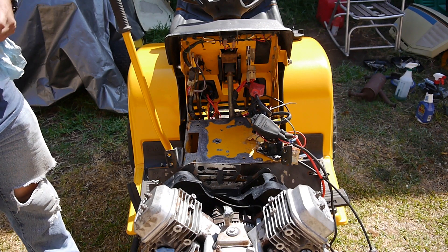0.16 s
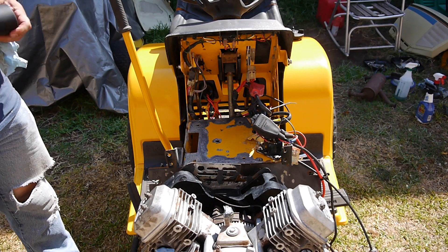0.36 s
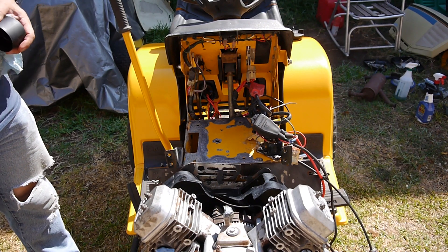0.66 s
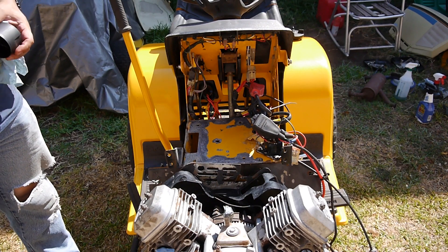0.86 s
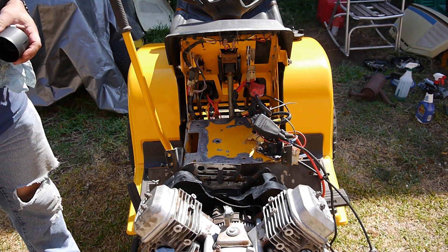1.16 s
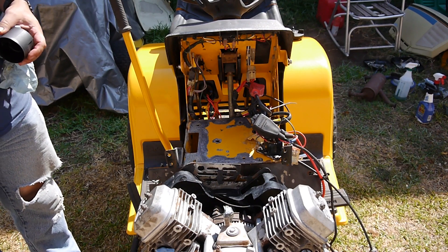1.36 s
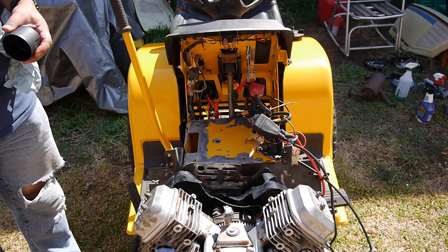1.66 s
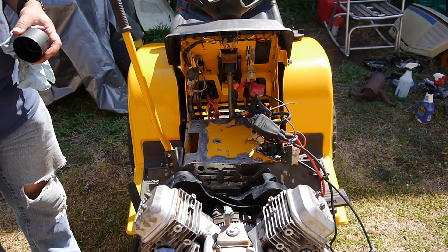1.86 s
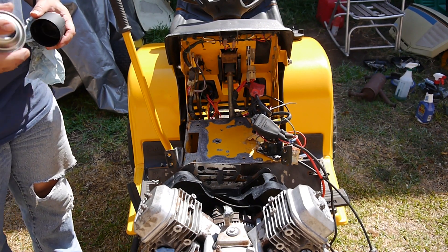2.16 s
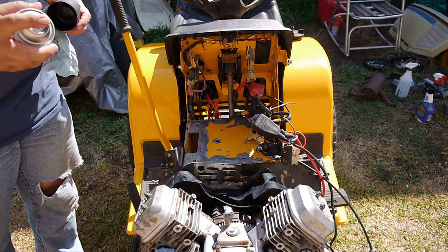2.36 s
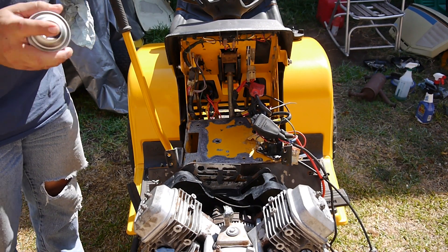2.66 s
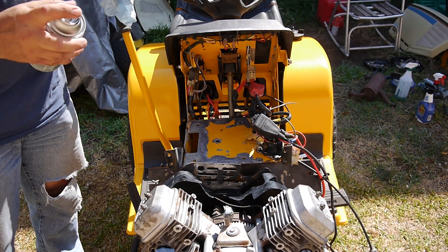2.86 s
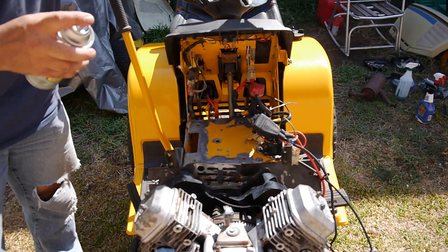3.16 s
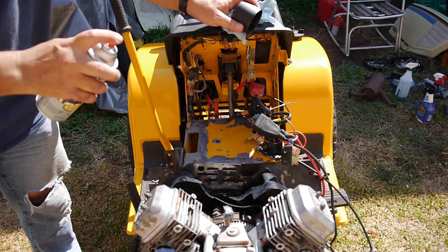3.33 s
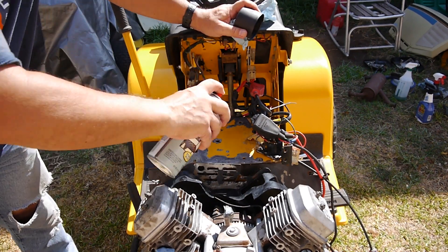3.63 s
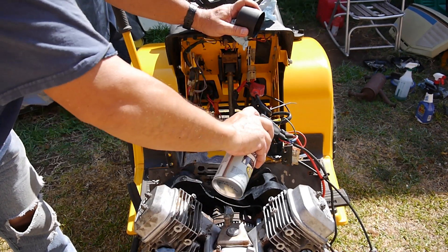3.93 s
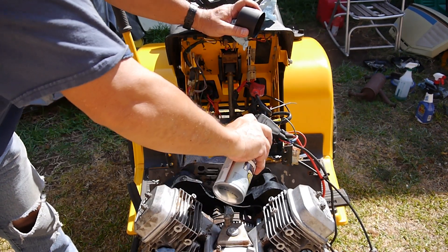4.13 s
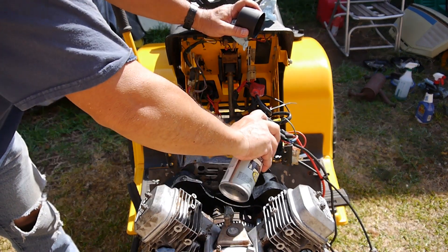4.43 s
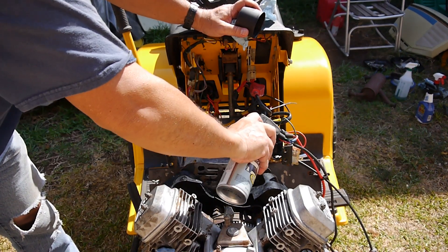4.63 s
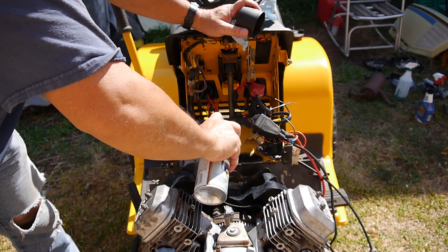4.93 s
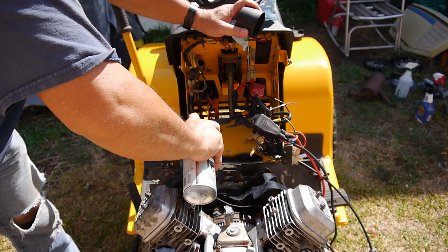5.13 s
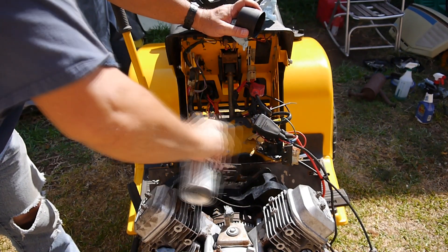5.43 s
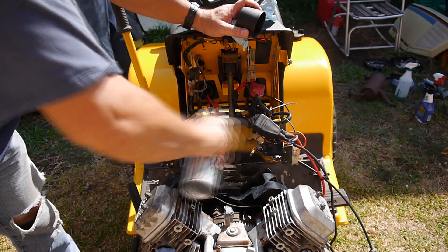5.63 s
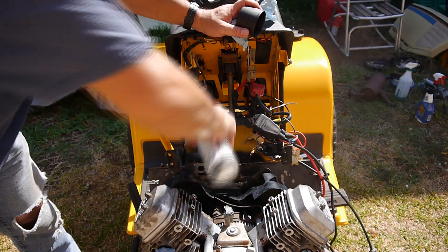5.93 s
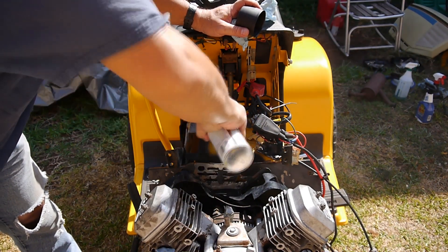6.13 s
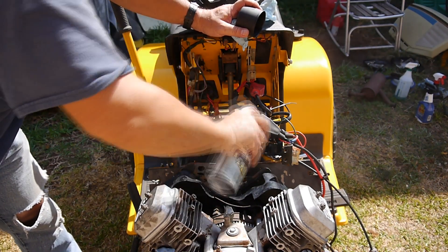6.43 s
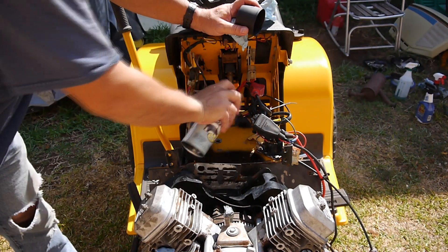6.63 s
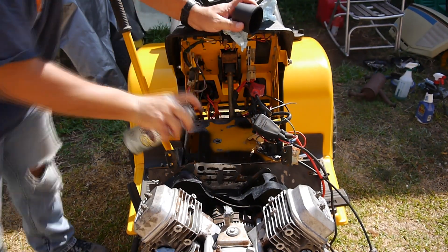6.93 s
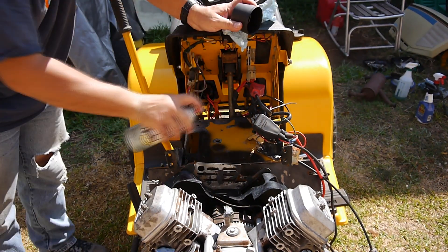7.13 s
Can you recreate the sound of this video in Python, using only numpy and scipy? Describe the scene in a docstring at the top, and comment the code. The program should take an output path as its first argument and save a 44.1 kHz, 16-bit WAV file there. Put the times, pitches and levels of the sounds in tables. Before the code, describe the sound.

In a quiet yard, a paint can is shaken close by: a hard ball clacks and rolls in tin with quick, uneven metallic clicks, while wind thumps at the microphone. The rattle thins out, a knock follows, then the nozzle hisses in a few longer sprays and many short puffs, with faint ball ticks between them.

```python
"""Outdoors, in a quiet yard, a spray can is shaken: its ball strikes and rolls along the tin wall and domes.
Blows and rolling excite decaying modes and cracks of noise, echoed by the ground. Knocks and pops are short
bursts and swings. Wind, strongest at first, is lumpy low noise at the microphone. Later the nozzle hisses
in long and short bursts, as coloured noise with narrow tones, and its jet roars on a machine.
The yard's traffic and leaves are coloured noise below it all."""
import sys
import numpy as np
from scipy import signal
from scipy.fft import rfft, irfft
from scipy.io import wavfile
from scipy.ndimage import uniform_filter1d

SR = 44100
rng = np.random.default_rng(int(sys.argv[2]) if len(sys.argv) > 2 else 0)


def waveform_to_disk(signal):
    """Save audio, clipped to [-1, 1], as 16-bit WAV at the path in sys.argv[1]."""
    frames = np.transpose(np.atleast_2d(signal))
    scaled = np.clip(frames, -1, 1) * 32767
    samples = np.round(scaled).astype(np.int16)
    wavfile.write(sys.argv[1], SR, samples)


N = 321489
TIME_S = np.arange(N) / SR


def undb(db):
    """Amplitude factor of a level in dB."""
    return 10 ** (np.asarray(db) / 20)


def unit(x):
    """Scale to rms 1."""
    return x / np.sqrt(np.mean(x ** 2))


def curve(table, col):
    """One column over time, in dB; -120 dB outside the table."""
    rows = np.array(table)
    return np.interp(TIME_S, rows[:, 0], rows[:, col], left=-120, right=-120)


def coloured(points):
    """Noise with the given spectrum, rms 1."""
    hz = np.arange(1, N // 2 + 2) * SR / N
    point_hz, point_db = np.array(points).T
    db = np.interp(np.log(hz), np.log(point_hz), point_db)
    return unit(irfft(rfft(rng.standard_normal(N)) * undb(db), N))


def band(x, lo_hz, hi_hz):
    """Band-pass filter."""
    sos = signal.butter(2, [lo_hz, min(hi_hz, .45 * SR)], "band", fs=SR, output="sos")
    return signal.sosfilt(sos, x)


def walk(rate_hz):
    """Random levels, a new one each 1 / rate_hz s, joined by ramps; spread near 1."""
    hold = int(SR / rate_hz)
    steps = np.repeat(rng.standard_normal(N // hold + 1), hold)
    return uniform_filter1d(steps, hold)[:N]


def add(out, start_s, y):
    """Mix y into out from start_s, cut at the end."""
    i = int(start_s * SR)
    out[i:i + len(y)] += y[:len(out) - i]


# Spectrum of the yard. Each row: frequency in Hz, relative level in dB per Hz.
YARD_SPECTRUM = [(18, -48), (30, -23), (38, -11.5), (174, -4), (204, -10), (273, -4.5), (415, -2),
                 (449, -6), (780, -3), (1040, -7.5), (2830, -17.5), (7670, -14), (16000, -35)]
# Yard level. Each row: time in seconds, level below 2 kHz in dB, level above in dB.
YARD_LEVEL = [(0, -46, -40), (1.6, -46, -47), (2.9, -45.5, -48), (3.7, -44.5, -48), (4.5, -44, -46),
              (5.33, -45, -48.5), (5.36, -48, -57), (6.9, -50.5, -56), (7.29, -42.5, -54)]


def yard():
    """Distant traffic and leaves: coloured noise in two bands, swelling a little."""
    air = coloured(YARD_SPECTRUM)
    low = signal.sosfilt(signal.butter(2, 2000, fs=SR, output="sos"), air)
    low_db = curve(YARD_LEVEL, 1) + 2.2 * walk(5)
    high_db = curve(YARD_LEVEL, 2) + 0.12 * walk(2.5)
    return unit(low) * undb(low_db) + unit(air - low) * undb(high_db)


# Puffs at the microphone, an early and a late group.
# Each row: peak in seconds, rumble in dB, half length to 1/e in seconds, upper band re rumble in dB.
WIND_PUFFS = [
    [(0, -29, 0.044, -9.5), (.1, -30, 0.024, -11), (.19, -30, 0.067, -9), (.35, -24.5, 0.05, -4),
     (.46, -33, 0.087, -14), (.655, -25.5, 0.014, 3), (.7, -30, 0.043, 6.5), (.735, -29, 0.028, 0.1),
     (.83, -26.5, 0.013, -33), (.94, -30.5, 0.057, -3), (1.1, -34, 0.058, -6), (1.22, -35.5, 0.03, -10),
     (1.33, -35, 0.059, -4), (1.54, -34.5, 0.073, -19), (1.72, -36.5, 0.064, -17), (1.86, -33.5, 0.02, -24),
     (1.91, -29, 0.035, -10), (2.04, -33.5, 0.046, -6), (2.26, -36.5, 0.034, -4)],
    [(6.74, -50, 0.06, -16), (6.93, -45, 0.11, -12)],
]


def wind():
    """Turbulent puffs: lumpy rumble, each with its share of an upper band; the late rumble is narrower."""
    def rumble(lo_hz, hi_hz):
        return unit(band(band(rng.standard_normal(N), lo_hz, hi_hz), lo_hz, hi_hz))

    out = 0
    for group, top_hz in zip(WIND_PUFFS, (280, 165)):
        lumps = undb(4.5 * walk(80))
        low, deep, high = rumble(101.2, top_hz), rumble(55.0, 97.4), rumble(204, 472)
        high = high + undb(-4.5) * unit(band(rng.standard_normal(N), 390, 900))
        puffs = [undb(db) * np.exp(-((TIME_S - peak_s) / half_s) ** 2) for peak_s, db, half_s, _ in group]
        upper = sum(puff * undb(row[3]) for puff, row in zip(puffs, group))
        out = out + lumps * (sum(puffs) * (low + undb(-13.0) * deep) + upper * high)
    return out


POP_MAX_HZ = 450  # at or below: pop at the microphone; above: knock on the machine
# Each row: start in seconds, peak in dB, centre in Hz, t60 in seconds.
KNOCKS = [(0.659, -11, 397, 0.023), (0.659, -19, 700, 0.03), (0.723, -4, 317, 0.0099),
          (0.891, -20.5, 293, 0.033), (0.909, -21, 219, 0.035), (0.927, -19.5, 236, 0.026),
          (0.945, -23.5, 339, 0.04), (1.073, -22, 230, 0.034), (1.12, -25, 304, 0.032),
          (1.336, -23, 234, .035), (1.979, -14.5, 196, 0.017), (3.566, -36, 140, 0.034),
          (3.87, -11.5, 2780, 0.035), (3.872, -23, 1600, 0.14), (3.88, -21, 517, 0.18),
          (4.134, -35.5, 140, 0.02), (4.368, -31, 146, 0.024), (6.329, -16.5, 2700, .015),
          (6.845, -26.5, 470, 0.11)]


def knocks():
    """Knocks are short noise tails around a centre; low pops are membrane swings. Rows: pops, knocks."""
    out, t_s = np.zeros((2, N)), np.arange(8192) / SR
    for (start_s, db, hz, t60_s), noise in zip(KNOCKS, rng.standard_normal((len(KNOCKS), 8192))):
        decay = 1000 ** (-t_s / t60_s)
        if hz > POP_MAX_HZ:
            burst = band(noise * decay, hz / 3, hz * 3)
        else:
            burst = np.sin(2 * np.pi * hz * t_s) * t_s * decay
        add(out[int(hz > POP_MAX_HZ)], start_s, undb(db) * burst / np.max(np.abs(burst)))
    return out


def resonances(peaks, rate_hz, waver_db):
    """Narrow bands of noise, each fading in and out on its own."""
    bands = []
    for hz, width_hz, db in peaks:
        tone = unit(band(rng.standard_normal(N), hz - width_hz / 2, hz + width_hz / 2))
        bands.append(tone * undb(db + waver_db * walk(rate_hz)))
    return bands


SWELL_DB_PER_S = 13  # the jet strengthens while the valve is held
# Nozzle bursts. Each row: open in seconds, shut in seconds, hiss in dB, roar on the machine in dB, mid-burst.
BURSTS = [(4.176, 4.337, -33.5, -37), (4.597, 5.005, -32, -37.5), (5.247, 5.352, -30.5, -39),
          (5.351, 5.398, -35.5, -45), (5.438, 5.525, -36.5, -42), (5.541, 5.621, -36, -49),
          (5.654, 5.723, -36.5, -48), (5.785, 5.841, -37.5, -50), (5.886, 5.923, -33, -44),
          (5.984, 6.086, -37.5, -43), (6.111, 6.201, -37, -47), (6.212, 6.279, -37, -46.5),
          (6.306, 6.364, -36.5, -64), (6.394, 6.503, -38.5, -50.5), (6.552, 6.567, -34.5, -58),
          (6.673, 6.719, -35.5, -47), (6.791, 6.836, -37.5, -45), (7.061, 7.103, -36.5, -58),
          (7.146, 7.193, -36, -57), (7.248, 7.297, -34.5, -48)]
# Jet spectrum. Each row: frequency in Hz, relative level in dB per Hz.
JET_SPECTRUM = [(710, -17), (1200, -5), (2000, -6), (2980, -6.5), (4550, -2), (4750, -3), (6160, -4),
                (8350, 1), (10900, 0), (16000, -12.5)]
# Nozzle tones, lowest first. Each row: centre in Hz, width in Hz, level re hiss in dB.
NOZZLE_TONES = [(4830, 110, -14), (5350, 200, -21), (6820, 150, -19), (7750, 200, -17), (8250, 150, -17),
                (8600, 150, -18), (9030, 120, -19), (10630, 150, -18), (11200, 100, -21)]
# Gain on the lowest nozzle tone. Each row: time in seconds, gain in dB.
WHISTLE_GAIN = [(0, 7), (4.34, 4), (4.6, -2), (4.72, 5), (4.9, 0), (5.0, -3), (7.29, -3)]
# Resonances where the jet lands. Each row: centre in Hz, width in Hz, relative level in dB.
HOLLOWS = [(392, 170, 0), (504, 31, -14), (680, 120, -5), (926, 113, -3.5), (1224, 130, -12)]


def spray(edge_s=0.034):
    """Jet hiss through the nozzle and a low roar where it lands; the valve opens and shuts softly."""
    hiss, roar = np.zeros(N), np.zeros(N)
    for open_s, shut_s, hiss_db, roar_db in BURSTS:
        valve = np.clip(np.minimum(TIME_S - open_s, shut_s - TIME_S) / edge_s + .5, 0, 1) ** 2
        valve = valve * undb(SWELL_DB_PER_S * (TIME_S - (open_s + shut_s) / 2))
        hiss += valve * undb(hiss_db)
        roar += valve * undb(roar_db)
    sputter = undb(1.0 * walk(120))
    whistle = resonances(NOZZLE_TONES[:1], 20, waver_db=2)[0]
    upper_tones = resonances(NOZZLE_TONES[1:], 14, waver_db=5)
    jet = coloured(JET_SPECTRUM) + whistle * undb(curve(WHISTLE_GAIN, col=1)) + sum(upper_tones)
    landing = unit(sum(resonances(HOLLOWS, 15, waver_db=4.5)))
    return sputter * hiss * jet + roar * landing


FREE_WIDTH_HZ, MUTED_DB = 140, -12
# Wall modes left free as the paint shifts, in two groups.
# Each row: time in seconds, centre of the free ones in Hz.
FREE_CENTRE = [
    [(0.0, 1900), (0.05, 1920), (0.08, 1616), (0.28, 1880), (0.38, 1620), (0.46, 1810), (0.67, 1740),
     (0.76, 1560), (0.82, 1690), (1.34, 1710), (1.39, 1570), (1.43, 1860), (1.9, 1794), (2.04, 1770),
     (2.07, 1690), (2.71, 1800), (2.8, 1790), (2.83, 1620), (2.89, 1700), (3.02, 2020), (3.36, 1770),
     (3.45, 1520)],
    [(6.32, 1910), (6.41, 1970), (6.43, 1730)],
]


def free_db(hz, at_s):
    """How much the paint mutes a wall mode at a given time."""
    rows = np.vstack(FREE_CENTRE)
    offset_hz = hz - np.interp(at_s, rows[:, 0], rows[:, 1])
    return MUTED_DB * (1 - np.exp(-(offset_hz / FREE_WIDTH_HZ) ** 2))


SLOSH_S = .0015


def ring(modes, chance, scatter_db=5, detune=0.026, rise_s=0.00014, rough=0.47):
    """One blow on a set of modes; where the ball lands sets each mode's share. Peak 1."""
    hz, db, t60_s = np.array(modes).T[:, :, None]
    detune_draw, level_draw, phase_draw = chance[:, :len(hz), None]
    t_s = np.arange(4096) / SR
    tones = np.sin(2 * np.pi * hz * (1 + detune * detune_draw) * t_s + np.pi * phase_draw)
    y = np.sum(undb(db + scatter_db * level_draw) * tones * 1000 ** (-t_s / t60_s), axis=0)
    # sloshing paint loads the tin unevenly, so the ring stutters
    slosh = np.interp(t_s, np.arange(48) * SLOSH_S, np.resize(chance[2] * chance[0, ::-1], 48))
    y = y * (1 - np.exp(-t_s / rise_s)) * (1 + rough * slosh)
    return y / np.max(np.abs(y))


ROLL_START_S, ROLL_FADE_S = 0.0094, 0.15
# Spells of rolling in the paint. Each row: start in seconds, stop in seconds, wall in dB, domes in dB.
ROLL_SPELLS = [(0, 0.73, -48, -53.5), (0.47, 0.6, -41, -56), (0.842, 0.967, -35, -44.5),
               (0.913, 1.503, -38.5, -50.5), (1.66, 2.148, -48, -61), (2.214, 2.777, -39.5, -49),
               (2.795, 2.982, -47, -66), (3.004, 3.4, -53.5, -75), (6.36, 6.44, -55, -59)]


def spells(col):
    """Gain of the rolling: a quick start, a hold and a slower fade for each spell."""
    gain = 0
    for row in ROLL_SPELLS:
        edge = np.minimum((TIME_S - row[0]) / ROLL_START_S, (row[1] - TIME_S) / ROLL_FADE_S)
        gain = gain + undb(row[col]) * np.clip(edge + .5, 0, 1) ** 2
    return gain


TUMBLE_DB, TUMBLE_S = -36.5, 0.052  # base level re blow; decay to 1/e


def tumble(col, extra_db):
    """After a blow the ball tumbles on where it struck: gain jumps at each strike and dies away."""
    out, t_s = np.zeros(N), np.arange(16384) / SR
    for row in STRIKES:
        add(out, row[0], undb(row[col] + TUMBLE_DB + extra_db) * np.exp(-t_s / TUMBLE_S))
    return out


WET = .6  # share of the domes' ring time left under rolling paint
STIFF_HZ, STIFF_DB_PER_DB = 4500, 1  # dome modes above this need a hard blow
GRIP_S, GRIP_DB = 4.0, -11.5  # from here a finger on the nozzle mutes the ring, not the crack


def rolling(rate_hz=700, spread_db=4, lurch_db=1.5, dome_db=-2.5, scrape_db=5):
    """Tiny uneven bounces keep wall and domes ringing and scraping between strikes; wet domes ring shorter."""
    hits = rng.random(N) < rate_hz / SR
    uneven = undb(spread_db * np.minimum(rng.exponential(size=N), 4))
    bounces = hits * uneven * undb(2.5 * walk(30))

    def excite(mode):
        impulse = undb(mode[1]) * ring([mode], np.zeros((3, 8)), rough=0)
        return signal.fftconvolve(bounces * rng.choice([-1, 1], N), impulse)[:N]

    wander_hz = 110 * walk(40)  # the ball keeps finding other spots
    wall = unit(sum(undb(free_db(mode[0] + wander_hz, TIME_S)) * excite(mode) for mode in WALL_MODES))
    soft_dome = [(hz, db, WET * t60_s) for hz, db, t60_s in DOME_MODES if hz < STIFF_HZ]
    dome = unit(sum(excite(mode) * undb(5 * walk(25)) for mode in soft_dome))
    dome = dome * undb(GRIP_DB * (TIME_S > GRIP_S))
    contact = signal.lfilter([1], [1, -np.exp(-1 / (.002 * SR))], bounces)  # 2 ms decay
    scrape = unit(contact * coloured(CRACK_SPECTRUM))
    on_wall = spells(col=2) * undb(lurch_db * walk(6.9)) + tumble(col=2, extra_db=10.5)
    on_dome = spells(col=3) + tumble(col=1, extra_db=-0.5)
    return on_wall * wall + on_dome * (undb(dome_db) * dome + undb(scrape_db) * scrape)


DOME_CRACK_DB, WALL_CRACK_DB = -11, -8.5  # how much of each blow cracks
SOFT_DB, SOFT_DB_PER_DB = -17, 0.16  # gentle blows ring more than they crack
# Ball strikes. Each row: start in seconds, blow on the domes in dB, blow on the wall in dB.
STRIKES = [(0.0197, 4.5, -26), (0.1087, -0.5, -10.5), (0.145, -6.5, -15.5), (0.212, -24, -18),
           (0.2589, 6.5, -36), (0.299, -26, -52), (0.3145, -35, -16), (0.352, -20, -24.5),
           (0.3717, -4, -16), (0.3793, -33, -13), (0.4497, -19, -12.5), (0.4694, 5, -73),
           (0.4896, -8.5, -24), (0.558, -46, -18.5), (0.6065, -4.5, -16.5), (0.642, -12, -19),
           (0.8469, -22, -29), (0.857, -29, -25), (0.9337, -7, -22.5), (0.978, -28, -27),
           (0.9954, -19, -32), (1.035, -21, -24.5), (1.1079, -12.5, -33), (1.129, -28, -39),
           (1.157, -32, -34), (1.172, -42, -39), (1.19, -36, -38), (1.206, -21, -30), (1.2159, -19.5, -26),
           (1.265, -23, -26), (1.290, -15.5, -30), (1.3372, -17.5, -30), (1.3695, -18.5, -51),
           (1.386, -20.5, -22.5), (1.403, -19, -18), (1.424, -18.5, -19), (1.449, -30.5, -23),
           (1.4739, -21, -23), (1.505, -20, -28), (1.6714, -23.5, -22), (1.704, -16.5, -22.5),
           (1.7603, -9, -22), (1.8252, -30, -23.5), (1.908, -20, -13.5), (2.003, -17, -22.5),
           (2.0166, -2, -15.5), (2.0891, -37, -12.5), (2.118, -16, -23), (2.138, 3.5, -35),
           (2.2193, -17, -19.5), (2.2469, -3.5, -13.5), (2.273, -15, -11), (2.3218, -12, -15),
           (2.3368, 6.5, -49), (2.365, -4.5, -53), (2.395, -41, -35), (2.419, -28, -20.5),
           (2.443, -31, -21.5), (2.472, -1.5, -14.5), (2.5523, -43, -17.5), (2.573, -31, -27),
           (2.598, 3.5, -64), (2.6416, -21, -17.5), (2.6894, -24, -20), (2.7334, -10, -28),
           (2.739, -50, -9.5), (2.7485, -45, -36), (2.7759, -16, -14.5), (2.8134, -27, -26.5),
           (2.86, -28, -32), (3.019, -10, -24), (3.0636, -22.5, -40), (3.1052, -25, -46),
           (3.1611, -27, -26), (3.167, -20.5, -34), (3.235, -29, -31), (3.2574, -40, -30),
           (3.2994, -20, -33.5), (3.33, -25.5, -33.5), (3.439, -21, -26.5), (5.894, -24, -31),
           (6.006, -17.5, -28), (6.231, -17.5, -27), (6.247, -23, -33), (6.328, -29, -25),
           (6.345, -25, -36), (6.359, -50, -24), (6.398, -32, -24), (6.411, -19.5, -29), (6.423, -50, -29),
           (6.5601, -21, -25.5), (6.6203, -31, -29)]
# Modes of the soft wall. Each row: nominal frequency in Hz, relative level in dB, t60 in seconds.
WALL_MODES = [(1353, 2.5, 0.021), (1540, -3, 0.027), (1654, -0.5, 0.018), (1733, -4.5, 0.041),
              (1853, -3.5, 0.025), (1958, -6, 0.092), (2234, -2.5, 0.015)]
# Modes of the stiff domes. Each row: nominal frequency in Hz, relative level in dB, t60 in seconds.
DOME_MODES = [(3400, -12, .015), (3760, -6, .02), (3940, -5, .025), (4090, 0, .035), (4200, -4, .02),
              (4820, -3, .035), (5250, -6, .02)]
# Modes of the dull body of paint. Each row: nominal frequency in Hz, relative level in dB, t60 in seconds.
PAINT_MODES = [(633, 0.0032, 0.021), (964, 0.00745, 0.016)]
# Colour of the countless short high modes. Each row: frequency in Hz, relative level in dB per Hz.
CRACK_SPECTRUM = [(300, -10.5), (1000, -16), (2650, -6), (3400, 1), (4200, -2.5), (5200, -5), (6700, 2),
                  (7800, -2.5), (9500, -2.5), (11500, -12.5), (15000, -37)]


def strikes(snap_s=0.014, tail_s=0.05, tail_db=-11, tick_s=0.005, shade_db=3):
    """Each strike rings domes, wall and paint and cracks; the wall swells up a moment later."""
    out, crack, bright, tick = np.zeros((4, N))
    t_s = np.arange(4096) / SR
    damped = .25 + np.exp(-t_s / .003)  # the hand and paint take most of the domes' first swing
    decay = 1000 ** (-t_s / snap_s) + undb(tail_db) * 1000 ** (-t_s / tail_s)
    chances = rng.standard_normal((len(STRIKES), 3, 3, 8))
    for (start_s, dome_db, wall_db), chance in zip(STRIKES, chances):
        crack_amp = np.hypot(undb(dome_db + DOME_CRACK_DB), undb(wall_db + WALL_CRACK_DB))
        crack_db = 20 * np.log10(crack_amp)
        crack_db += SOFT_DB_PER_DB * min(crack_db - SOFT_DB, 0)
        dome_db, wall_db = np.array([dome_db, wall_db]) + GRIP_DB * (start_s > GRIP_S)
        dome = [(hz, db + STIFF_DB_PER_DB * dome_db * (hz > STIFF_HZ), t60_s) for hz, db, t60_s in DOME_MODES]
        wall = [(hz, db + free_db(hz, start_s), t60_s) for hz, db, t60_s in WALL_MODES]
        dome_ring = ring(dome, chance[0], 6.8, 0.011, rough=0.73) * damped
        wall_ring = ring(wall, chance[1], 3.8, 0.017, rise_s=0.0004) * damped ** 0.27
        add(out, start_s, undb(dome_db - 4.5) * dome_ring + undb(wall_db + 4.5) * wall_ring)
        add(out, start_s, undb((dome_db + wall_db) / 2 - 5.5) * ring(PAINT_MODES, chance[2]))
        # some strikes crack duller, some brighter
        tilt_db = shade_db * chance[2, 0, 5]
        add(crack, start_s, undb(crack_db - tilt_db) * decay)
        add(bright, start_s, undb(crack_db + tilt_db) * decay)
        # hard blows mean short contact, so the very top ticks out of proportion
        add(tick, start_s, undb(3.15 * crack_db + 11.0) * 1000 ** (-t_s / tick_s))
    noise = coloured(CRACK_SPECTRUM) * undb(4 * walk(400))  # gritty
    top = band(noise, 3260, 25000)
    ringing = band(out, 390, 11700)
    dull_crack = band(crack * (noise - top), 210, 20600)
    ticks = tick * unit(band(rng.standard_normal(N), 13000, 15000))
    return ringing + dull_crack + bright * unit(top) + ticks


GROUND_S, GROUND_DB = .0073, -9.5


def outdoors(x, scatter_db=-12, t60_s=0.059):
    """One echo from the ground and a short scatter from the machine and clutter."""
    t_s = np.arange(8192) / SR
    unit_energy = np.sqrt(2 * np.log(1000) / t60_s / SR)
    response = undb(scatter_db) * rng.standard_normal(8192) * 1000 ** (-t_s / t60_s) * unit_energy
    response[0], response[int(GROUND_S * SR)] = 1, undb(GROUND_DB)
    return signal.fftconvolve(x, response)[:N]


def scene():
    """Can and machine knocks get the echo; the other layers stay dry. Two channels."""
    pops, thuds = knocks()
    mid = outdoors(strikes() + rolling() + thuds) + pops + spray() + wind() + yard()
    # nearly mono: a faint side share, flickering in sign, larger in treble and deep bass
    side = mid + .9 * band(mid, 2000, 9000) + 1.8 * band(mid, 9000, 18000) + 1.5 * band(mid, 15, 70)
    side = side * walk(300)
    return mid + undb(-25) * side * np.array([[1], [-1]])


GAIN_TOP_DB, GAIN_S, GAIN_SHARE = -22.5, 0.17, 0.38
TOP_HZ = 16000


def record(dry):
    """Gain control ducks after loud sound, the loudest strikes clip softly, the top is cut."""
    keep = np.exp(-1 / (GAIN_S * SR))
    loud = np.sqrt(signal.lfilter([1 - keep], [1, -keep], np.mean(dry ** 2, axis=0)))
    ducked = dry * (1 + loud / undb(GAIN_TOP_DB)) ** -GAIN_SHARE
    clipped = np.tanh(1.002 * ducked)
    return signal.sosfilt(signal.ellip(12, .2, 90, TOP_HZ, fs=SR, output="sos"), clipped)


dry = scene()
out = record(dry)
waveform_to_disk(out)
```